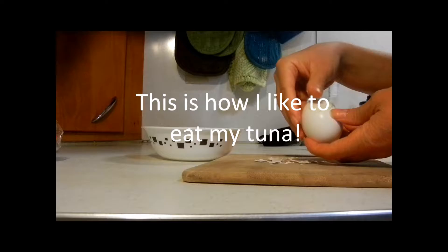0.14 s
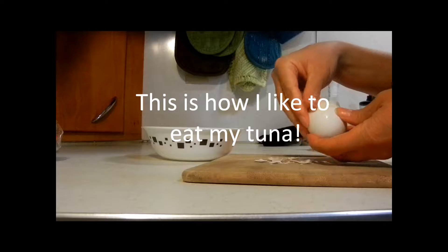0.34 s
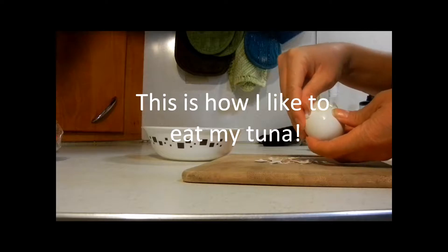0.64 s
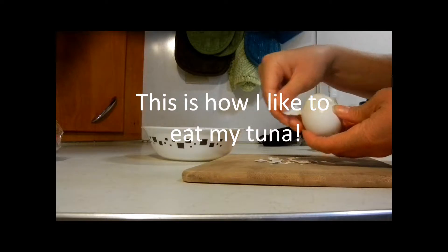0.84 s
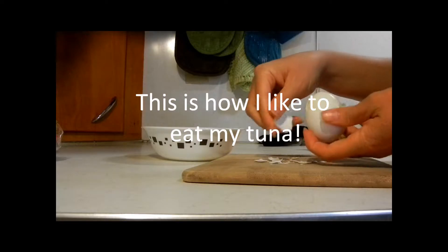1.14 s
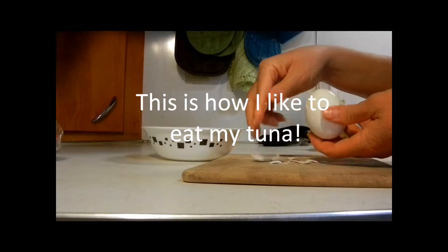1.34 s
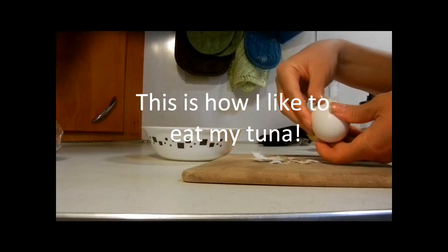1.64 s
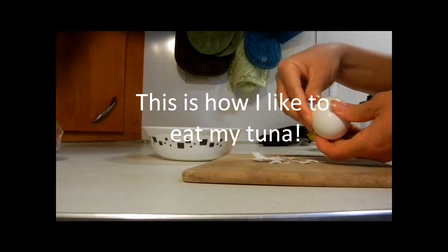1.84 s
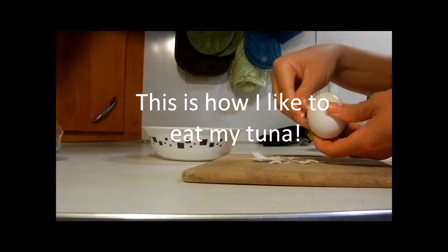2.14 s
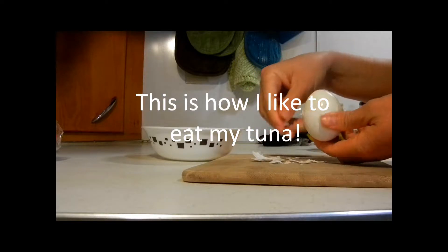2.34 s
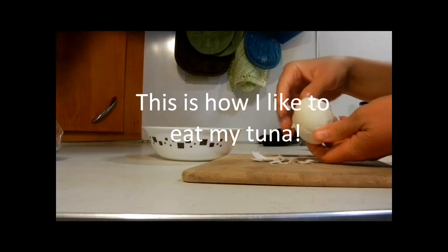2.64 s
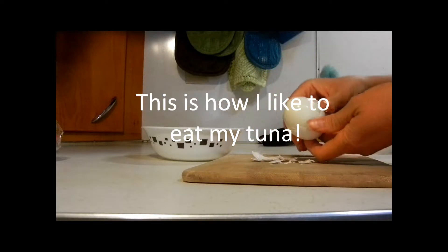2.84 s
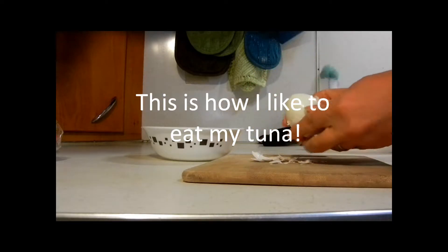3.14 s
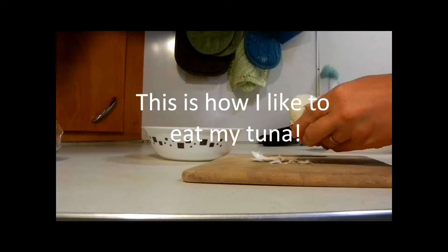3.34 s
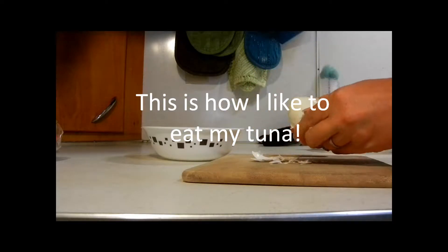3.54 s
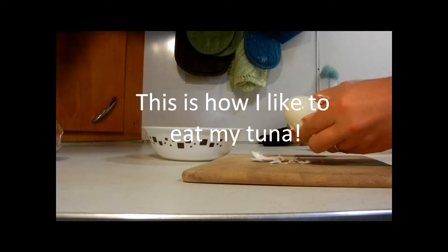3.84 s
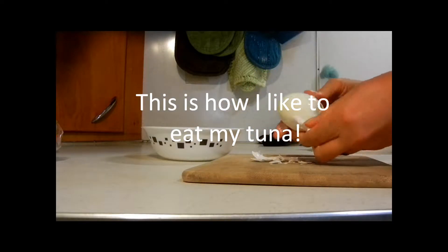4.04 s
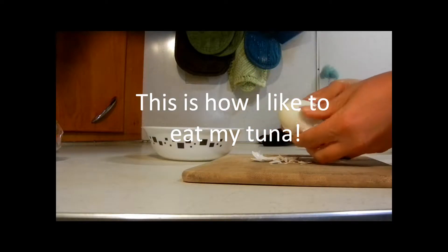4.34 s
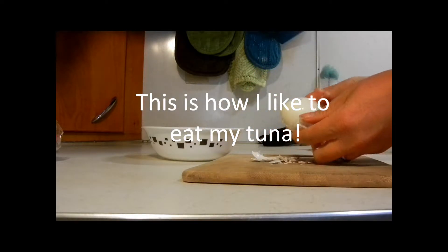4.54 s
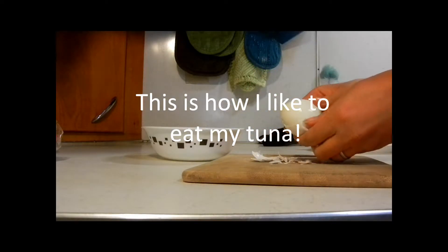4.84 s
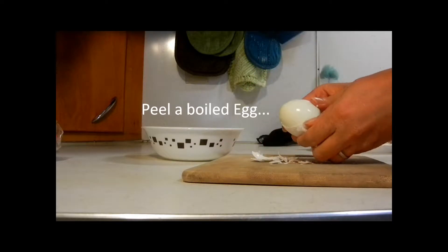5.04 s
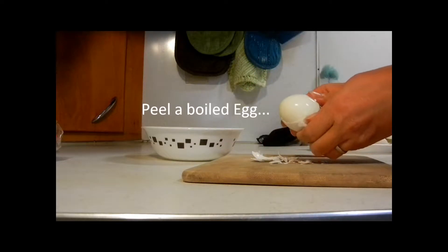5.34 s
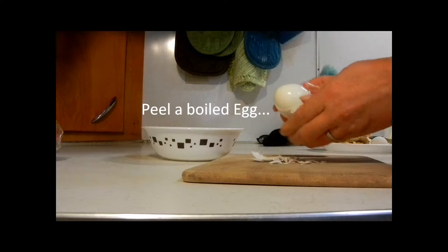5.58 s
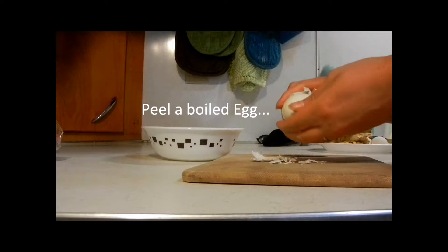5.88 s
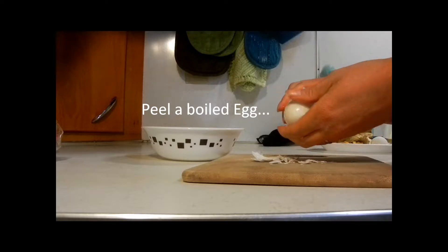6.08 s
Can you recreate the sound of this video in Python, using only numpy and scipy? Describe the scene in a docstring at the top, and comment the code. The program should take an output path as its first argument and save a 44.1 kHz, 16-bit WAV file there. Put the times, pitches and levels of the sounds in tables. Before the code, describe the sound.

A refrigerator hums steadily throughout, with a soft rush of air, in a small kitchen. Right at the start a bit of eggshell drops on a wooden board with a light, hard tap. A hard-boiled egg is being peeled by hand: the membrane tears and the shell cracks briefly around 0.8 seconds, and tiny fragments tick faintly on the board near 1.4. A run of crisp crackles follows from 2 to 2.3 seconds, and another bit lands at about 2.6. After a bright snap near 3.5, the loudest cluster of sharp, slightly hollow cracks comes at 3.9, trailing into crackling pulls until 4.2. Lighter pulls and cracks are scattered from 4.5 to 5.5 seconds, with a somewhat stronger group around 6. The peeling sounds fairly near and slightly to the right, with short reflections from the room.

```python
"""A hard-boiled egg is peeled by hand over a wooden board on a kitchen counter.
A refrigerator hums from the start and throughout. First a bit of shell drops and rings the board.
Then the membrane tears away in crackling pulls, the shell cracks and rings briefly, and more bits fall.
The loudest cracks come near 3.9 s, and lighter pulls and cracks follow to the end.
The wall behind the counter and the small room reflect every tap, tear and crack."""
import sys
import numpy as np
from scipy import signal
from scipy.fft import rfft, irfft, next_fast_len
from scipy.io import wavfile
from scipy.ndimage import map_coordinates

SR = 44100
rng = np.random.default_rng(int(sys.argv[2]) if len(sys.argv) > 2 else 0)


def wrap_up_sound(samples):
    """Save the sound to the file named by the first command line argument, as 16-bit audio."""
    columns = np.atleast_2d(samples).T
    # keep every value between -1 and 1, then stretch to whole-number steps
    tamed = np.clip(columns, -1, 1)
    steps = np.round(tamed * 32767).astype(np.int16)
    wavfile.write(sys.argv[1], SR, steps)


N = 273861
T = np.arange(N) / SR


def undb(db):
    """Amplitude ratio of a level in decibels."""
    return 10 ** (np.asarray(db) / 20)


def unit(x):
    """Normalisation to an rms of 1."""
    return x / np.sqrt(np.mean(x ** 2))


def colour(x, points):
    """Zero-phase filtering by a curve of (frequency [Hz], gain [dB]) points."""
    n = next_fast_len(len(x), True)
    hz, db = np.transpose(points)
    curve_db = np.interp(np.log(np.fft.rfftfreq(n, 1 / SR) + 1), np.log(hz), db)
    return irfft(rfft(x, n) * undb(curve_db), n)[:len(x)]


def band(x, lo_hz, hi_hz, order=2):
    """Causal band-pass filtering."""
    return signal.sosfilt(signal.butter(order, [lo_hz, hi_hz], "band", fs=SR, output="sos"), x)


def add(track, start_s, x):
    """Superposition of a short sound on a track."""
    i = int(start_s * SR)
    track[i:i + len(x)] += x[:N - i]


def impulse(x, db):
    """Equal energy: a transient is scaled to match 3 ms of steady sound at this level."""
    return x * undb(db) * np.sqrt(.003 * SR / np.sum(x ** 2))


def wander(per_s):
    """Random modulation: linear interpolation between normal draws, with a spread near 1."""
    return map_coordinates(rng.standard_normal(1024), [T * per_s], order=1, mode="mirror")


# motor harmonics: (multiple of the shaft rate, level [dB])
MOTOR_HARMONICS = [(1, -71.5), (2, -67.5), (4, -68), (5, -64), (6, -64.5), (7, -64), (9, -56), (11, -57),
                   (12, -62), (13, -65.5), (14, -65), (15, -65.5)]
# fan tones: (frequency [Hz], level [dB])
FAN_TONES = [(191.6, -54.5), (264, -64.5)]
# cabinet and duct resonances: (frequency [Hz], bandwidth [Hz], level [dB])
CABINET_MODES = [(190.7, 7.3, -65), (232.3, 16.7, -59), (268, 20, -70), (609.3, 7.7, -63),
                 (801, 5.8, -64.5)]
# rush of air and steady hiss: (frequency [Hz], relative level [dB])
AIR_SPECTRUM = [(25, -13), (70, -7), (130, -2), (220, 8), (370, 0.5), (560, 2), (780, -1.5), (1080, -8.5),
                (1400, -5), (2100, -10.5), (2900, -11), (4300, -22.5), (8500, -25.5), (15500, -26.5)]
# stereo width of the air: (frequency [Hz], side minus mid level [dB])
AIR_WIDTH = [(60, -6), (110, 0), (200, -13.5), (700, -11.5), (1050, -6), (1400, -7), (2380, -4), (4400, -1),
             (15000, -1)]


def refrigerator(shaft_hz=58.48, air_db=-49):
    """Forced vibration: motor and fan give wavering tones; rushing air excites the cabinet's modes."""
    def tone(hz, db, drift_rad):
        phase = 2 * np.pi * (hz * T + rng.random()) + drift_rad * wander(2.95)
        return np.sqrt(2) * undb(db) * np.sin(phase)
    hum = sum(tone(k * shaft_hz, db + .46 * wander(3.74), drift_rad=.12) for k, db in MOTOR_HARMONICS)
    hum += sum(tone(hz, db - wander(7), drift_rad=.57) for hz, db in FAN_TONES)
    for hz, width, db in CABINET_MODES:
        hum += undb(db) * unit(band(rng.standard_normal(N), hz - width / 2, hz + width / 2))
    air = [undb(air_db) * unit(colour(noise, AIR_SPECTRUM)) for noise in rng.standard_normal((2, N))]
    mid, side = hum + air[0], colour(air[1], AIR_WIDTH)
    return np.array([mid + side, mid - side])


# bits of shell landing: (time [s], board level [dB], edge click level [dB], snap level [dB])
LANDINGS = [(0.1015, -26, -39, -50), (1.3942, -45, -55, -43), (1.413, -48, -56, -62),
            (1.428, -47, -66, -56), (1.439, -42.5, -66, -58), (2.5717, -31.5, -57, -37)]
# board modes under a light, hard tap: (frequency [Hz], relative level [dB], 60 dB decay time [s])
BOARD_MODES = [(1480, 3, 0.021), (2060, 1, 0.023), (2620, 4, 0.012), (2776, 4, 0.014), (6360, -10, 0.01)]


def falling_bits(clatter_db=-7.5, clatter_s=.0087):
    """Impact excitation: a bit clicks on its edge, rings the board's modes and chatters as it settles."""
    out, t = np.zeros(N), np.arange(SR // 10) / SR
    for start_s, board_db, click_db, snap_db in LANDINGS:
        # every landing spot weights the modes a little differently
        spot_db = rng.normal(0, 1, len(BOARD_MODES))
        board = sum(undb(db + spot - 60 * t / t60) * np.sin(2 * np.pi * hz * t)
                    for (hz, db, t60), spot in zip(BOARD_MODES, spot_db))
        ring = impulse(band(board, 1100, 17000, order=3), board_db)
        clatter = band(rng.standard_normal(len(t)) * np.exp(-t / clatter_s), 1300, 3000)
        tap = ring + impulse(clatter, board_db + clatter_db)
        add(out, start_s, tap + brittle_click(t, click_db, snap_db))
    return out


def brittle_click(t, click_db, snap_db, click_s=.00066, snap_s=.00028):
    """A brief pulse has a broad spectrum: shell gives a click and a still shorter, brighter snap."""
    click = band(rng.standard_normal(len(t)) * np.exp(-t / click_s), 3450, 6700)
    snap = band(rng.standard_normal(len(t)) * np.exp(-t / snap_s), 8600, 16700)
    return impulse(click, click_db) + impulse(snap, snap_db)


def effort(from_peak_s, length_s):
    """Symmetric envelope: a pull builds up to its strongest moment and eases off again."""
    return np.exp(-np.abs(2 * from_peak_s / length_s) ** .89)


# pulls on shell and membrane: (peak time [s], length [s], crackle level [dB], hollow level [dB])
MEMBRANE_PULLS = [(0.705, 0.014, -55, -53), (0.77, 0.036, -57.5, -45), (0.811, .012, -40, -38.5),
                  (0.849, .035, -47, -60), (1.061, .06, -59.5, -70), (1.85, 0.029, -56, -63),
                  (2.082, 0.026, -51, -55), (2.135, 0.027, -34, -38), (2.244, 0.01, -38.5, -46),
                  (2.27, .025, -43, -52), (2.32, 0.021, -52, -68), (2.43, .025, -57.5, -68),
                  (3.492, 0.024, -45, -49.5), (3.609, 0.048, -50, -51.5), (3.817, 0.071, -54.5, -52.5),
                  (3.901, 0.016, -31.5, -25), (3.971, 0.0088, -36.5, -38), (4.062, 0.017, -45.5, -42.5),
                  (4.106, 0.032, -47, -48.5), (4.164, .03, -46.5, -52), (4.215, 0.032, -47.5, -49.5),
                  (4.45, .025, -59, -69), (4.62, 0.048, -55.5, -58), (4.79, .012, -54, -51),
                  (4.833, 0.027, -56.5, -53.5), (4.935, .025, -61, -59), (5.341, 0.046, -55, -50),
                  (5.634, 0.023, -75, -53.5), (5.93, .03, -50, -53.5), (5.984, 0.024, -42, -40),
                  (6.034, 0.022, -46, -57)]
# crackle of the tiny breaks: (frequency [Hz], relative level [dB])
CRACKLE_SPECTRUM = [(400, -20), (1300, 0), (2500, 3.5), (3700, 1.5), (4900, 4), (6500, 4), (8500, -3),
                    (11000, 0), (14000, 1.5), (16000, -4.5)]
# resonance of the hollow under the lifted shell: (frequency [Hz], relative level [dB])
HOLLOW_SPECTRUM = [(500, -30), (1000, -14), (1450, -16.5), (1850, -4), (2350, -2), (2700, 4), (3500, -8),
                   (6000, -33)]


def tearing(breaks_per_s=3000, scatter_db=3.6, stutter_db=2.5, rasp_s=.00012):
    """Shot noise: a swarm of tiny, uneven breaks crackles and excites the hollow under the shell."""
    size = undb(scatter_db * np.minimum(rng.exponential(size=N), 4))
    breaks = (rng.random(N) < breaks_per_s / SR) * size
    breaks *= undb(stutter_db * wander(120))  # the membrane holds and lets go in small jerks
    energy_decay = np.exp(-np.arange(64) / (rasp_s * SR))
    rasp = np.sqrt(np.convolve(breaks ** 2, energy_decay)[:N])
    crackle = unit(colour(rasp * rng.standard_normal(N), CRACKLE_SPECTRUM))
    hollow = unit(colour(rasp * rng.standard_normal(N), HOLLOW_SPECTRUM))
    out = np.zeros(N)
    for peak_s, length_s, crackle_db, hollow_db in MEMBRANE_PULLS:
        out += effort(T - peak_s, length_s) * (undb(crackle_db) * crackle + undb(hollow_db) * hollow)
    return out


def splinters(per_s=70, ring_hz=2710, pitch_spread=.058, spread_db=3, snap_db=-3):
    """Fracture under load: rows of small random cracks, each as strong as the pull at that moment."""
    rows = []
    for peak_s, length_s, crackle_db, hollow_db in MEMBRANE_PULLS:
        for k, (jitter, pitch, force) in enumerate(rng.random((16, 3))):
            from_peak_s = (k + jitter) / per_s - length_s
            if from_peak_s < length_s:
                db = 20 * np.log10(effort(from_peak_s, length_s)) + spread_db * (2 * force - 1)
                hz = ring_hz * (1 + pitch_spread * (2 * pitch - 1))
                rows.append((peak_s + from_peak_s, hz, hollow_db + db, crackle_db + snap_db + db))
    return rows


# louder cracks of the shell: (time [s], flake frequency [Hz], ring level [dB], snap level [dB])
SHELL_CRACKS = [(.7525, 2590, -37.5, -52), (.8078, 2400, -53, -40.5), (1.0062, 2460, -68, -49.5),
                (1.4913, 1960, -51.5, -51.5), (2.0628, 1820, -43, -46), (2.0932, 2227, -38, -44),
                (2.1439, 2710, -43, -44), (2.1757, 2400, -42, -46), (2.191, 3220, -44, -38),
                (2.2326, 2315, -56, -43), (2.2595, 2320, -39, -51), (3.4623, 8330, -42, -37),
                (3.466, 6440, -38, -46), (3.8595, 2433, -36, -48), (3.8889, 2780, -26, -43),
                (3.8923, 2487, -17, -52), (3.896, 2810, -26, -47), (3.9094, 2280, -17.5, -39),
                (3.9108, 1906, -25, -50), (3.9232, 2250, -30, -40), (3.946, 2430, -35, -54),
                (3.9692, 2530, -28.5, -48), (4.5281, 2610, -45.5, -60), (4.7933, 2540, -37.5, -50),
                (4.9265, 2700, -48, -59), (5.3395, 2480, -37.5, -57), (5.3445, 2050, -43, -60),
                (5.4436, 3360, -42, -45.5), (5.9756, 2700, -31, -45), (5.988, 3790, -38, -51),
                (6.1798, 2430, -41.5, -49.5)]


def cracks(ring_s=.0015, rise_s=.00048, sag=.37, sag_s=.00024, knock_db=-10, click_db=-4.5):
    """Damped free vibration: a flake springs back with a knock; the soft egg soon absorbs its ring."""
    out, t = np.zeros(N), np.arange(SR // 20) / SR
    for start_s, hz, ring_db, snap_db in SHELL_CRACKS + splinters():
        # the pitch sags as the bent flake relaxes
        phase = 2 * np.pi * np.cumsum(hz * (1 + sag * np.exp(-t / sag_s))) / SR
        envelope = np.exp(-t / ring_s) * (1 - np.exp(-t / rise_s))
        overtone = undb(-20) * np.sin(3.6 * phase)
        ring = envelope * (np.sin(phase) + overtone)
        knock = band(rng.standard_normal(len(t)) * np.exp(-t / .0019), hz * .83, hz * 1.86)
        flake = band(impulse(ring, ring_db) + impulse(knock, ring_db + knock_db), 1480, 19000, order=3)
        add(out, start_s, flake + brittle_click(t, snap_db + click_db, snap_db))
    return out


def from_the_right(x, shade_db=2.5, lag_s=.00001):
    """Path difference and shadowing: sound from the right reaches the left side later and duller."""
    n = next_fast_len(N, True)
    delay = np.exp(-2j * np.pi * np.fft.rfftfreq(n, 1 / SR) * lag_s)
    later = irfft(rfft(x, n) * delay, n)[:N]
    left = colour(later, [(4000, 0), (12000, -shade_db / 2)])
    right = colour(x, [(4000, 0), (12000, shade_db / 2)])
    return left, right


# reflections from near surfaces: (delay [s], gain [dB])
NEAR_ECHOES = [(.0042, -16), (.0069, -12)]
# diffuse field of the kitchen: (frequency [Hz], gain [dB])
ROOM_SPECTRUM = [(300, -10), (1400, 0.5), (2600, -3), (6000, 1), (14000, -2)]


def kitchen(dry, early_db=-5, early_t60=.06, late_db=-6, late_t60=.4, treble_t60=.46, mic_gap_m=.018):
    """Reverberation: two echoes, scatter from the counter corner and a tail follow the direct sound."""
    n = SR // 2
    t = np.arange(n) / SR
    onset = np.clip((t - .0015) / .00033, 0, 1)
    def decay(t60):
        return onset * undb(-60 * t / t60)
    diffuse = []
    for noise in rng.standard_normal((2, n)):
        early = noise * decay(early_t60)
        late = band(noise, 200, 8800) * decay(late_t60) + band(noise, 5600, 16800) * decay(treble_t60)
        field = undb(early_db) * unit(early) + undb(late_db) * unit(late)
        diffuse.append(colour(field, ROOM_SPECTRUM) / np.sqrt(n))
    # a diffuse field is alike at two close microphones at long wavelengths only
    coherence = np.sinc(2 * np.fft.rfftfreq(n, 1 / SR) * mic_gap_m / 343)
    mid = irfft(rfft(diffuse[0]) * np.sqrt((1 + coherence) / 2), n)
    side = irfft(rfft(diffuse[1]) * np.sqrt((1 - coherence) / 2), n)
    mid[0] += 1  # direct sound
    for delay_s, db in NEAR_ECHOES:
        mid[int(delay_s * SR)] += undb(db)
    left, right = from_the_right(dry)
    return np.array([signal.fftconvolve(left, mid + side)[:N],
                     signal.fftconvolve(right, mid - side)[:N]])


def scene():
    """Superposition: the egg and the board sound in the kitchen over the refrigerator's hum."""
    return kitchen(cracks() + tearing() + falling_bits()) + refrigerator()


def record(dry, cutoff_hz=16000):
    """Band limiting: a steep low-pass filter cuts the top of the treble."""
    return signal.sosfilt(signal.ellip(10, .2, 70, cutoff_hz, fs=SR, output="sos"), dry)


dry = scene()
out = record(dry)
wrap_up_sound(out)
```